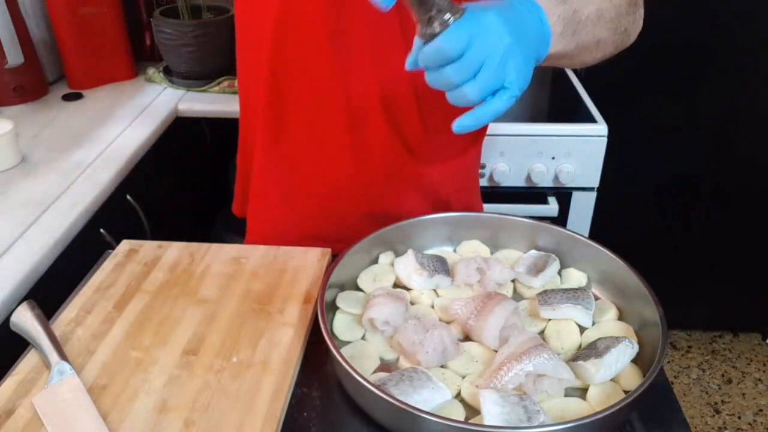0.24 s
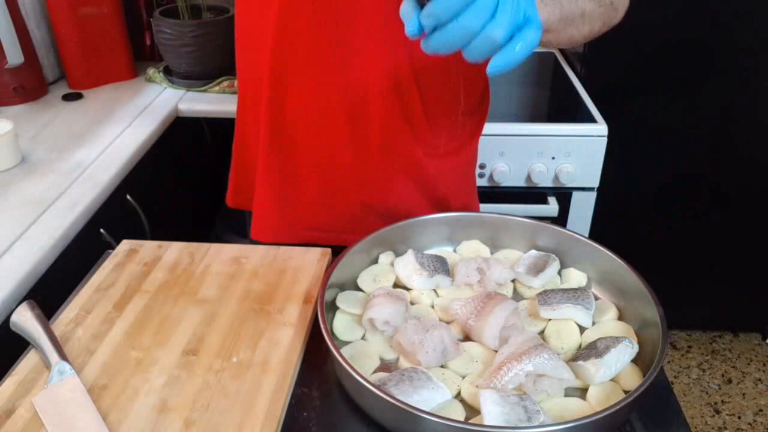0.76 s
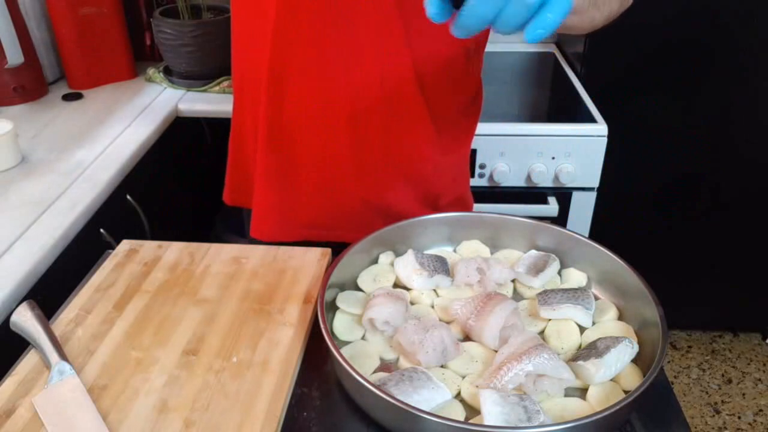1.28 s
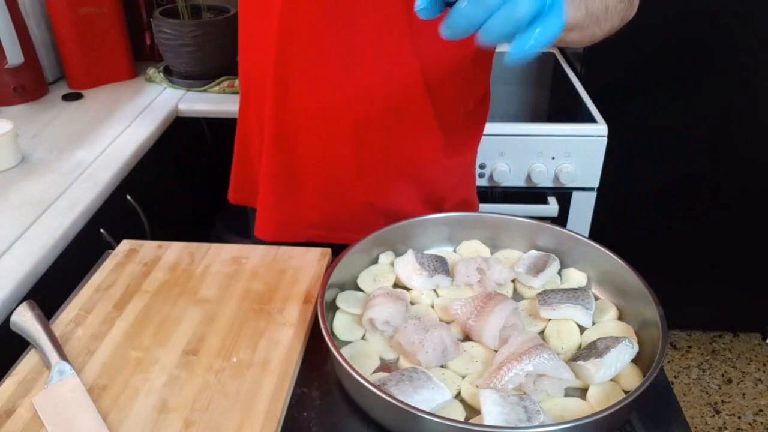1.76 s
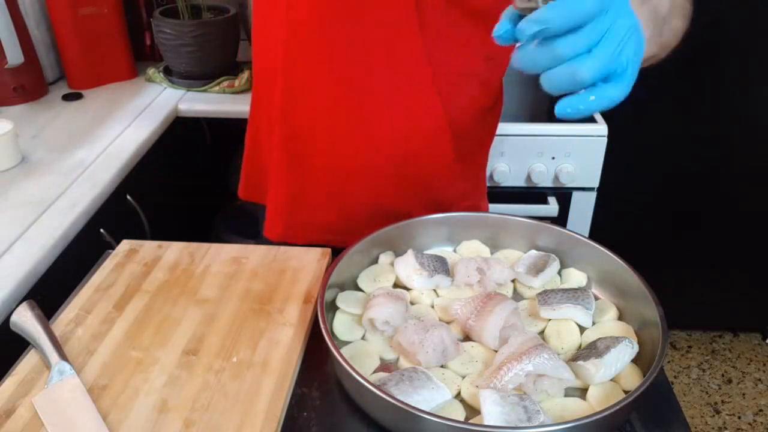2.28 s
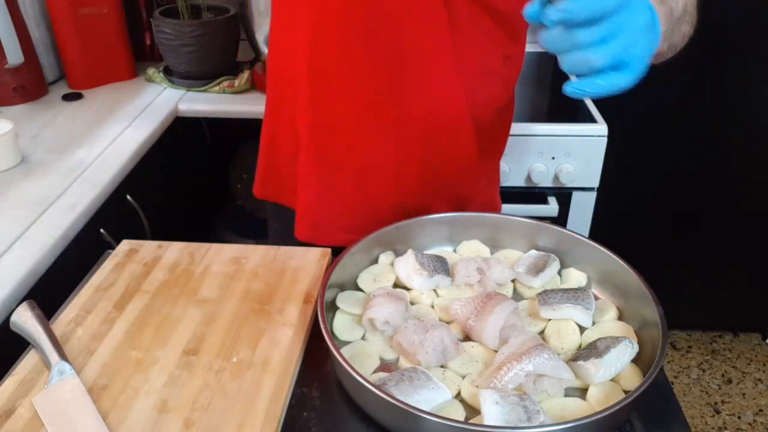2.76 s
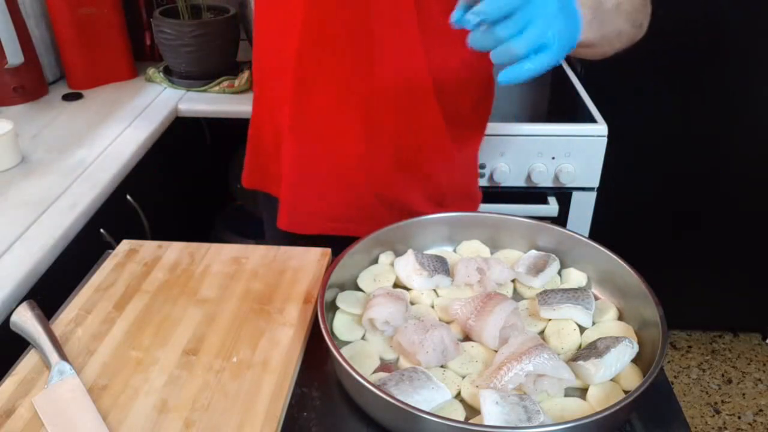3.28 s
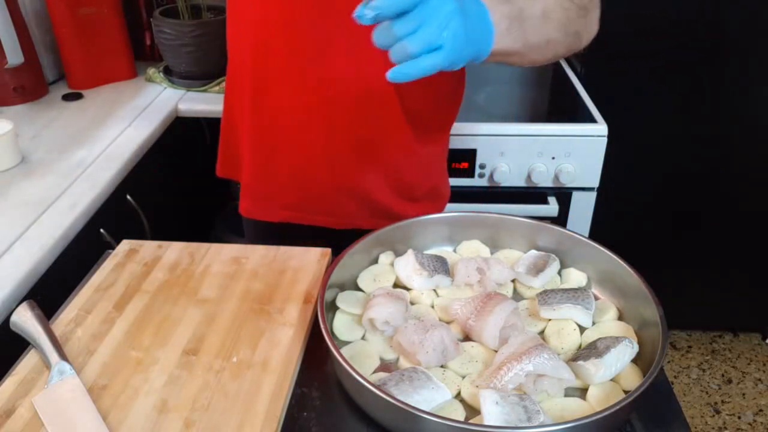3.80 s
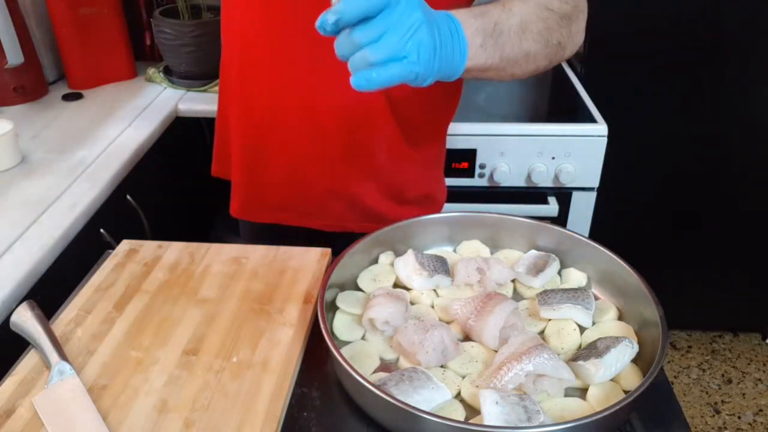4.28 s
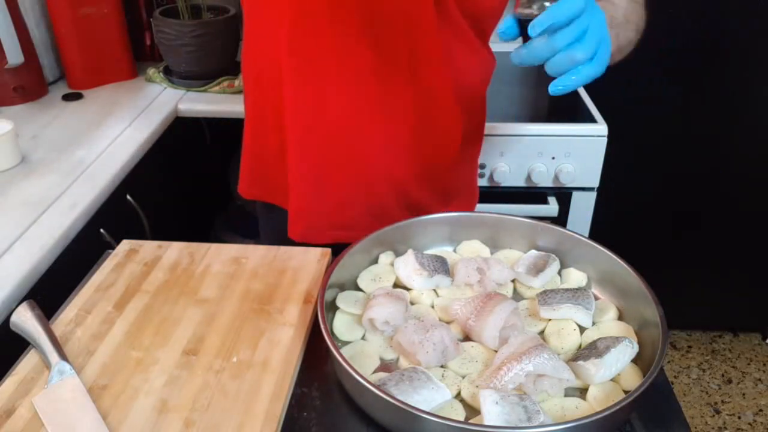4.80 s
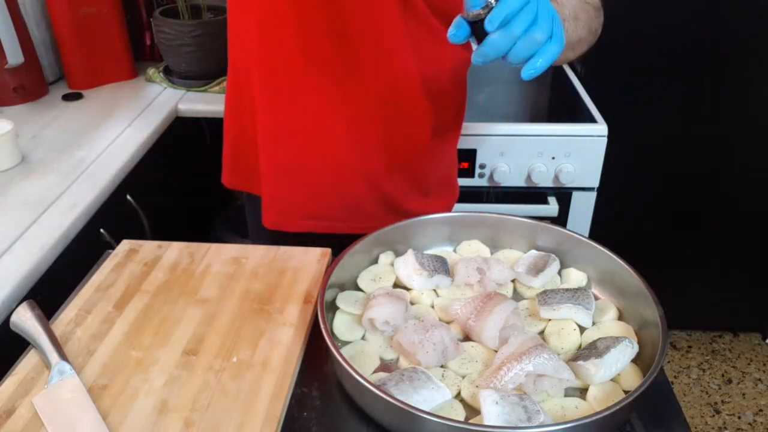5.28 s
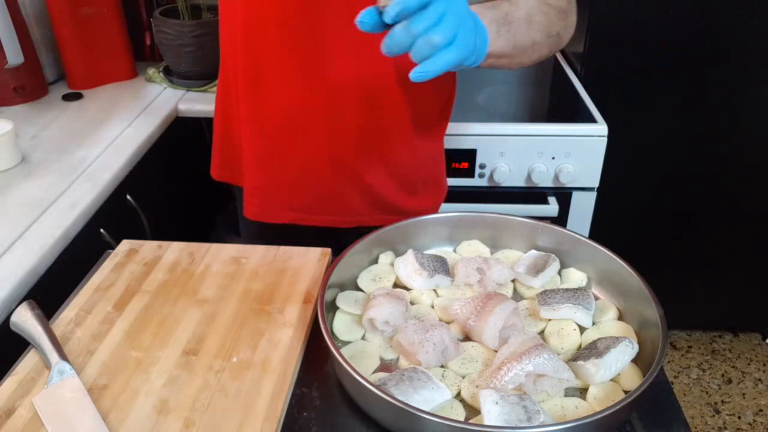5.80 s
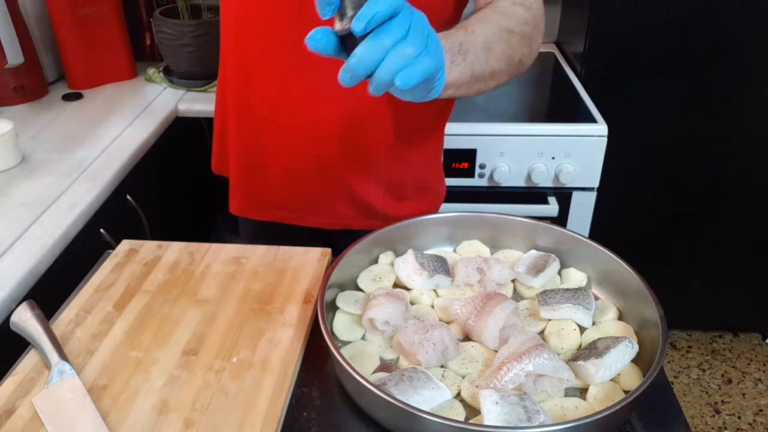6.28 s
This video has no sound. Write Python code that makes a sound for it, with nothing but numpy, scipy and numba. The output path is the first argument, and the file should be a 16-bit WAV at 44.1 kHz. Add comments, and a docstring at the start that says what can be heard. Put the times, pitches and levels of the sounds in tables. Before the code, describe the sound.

A pepper mill is turned by hand close to the microphone: brief dry crunches, each a cluster of brittle cracks with metallic burr rasp and a woody hollow undertone. Between strokes a gloved grip shifts with papery, squeaky-free rustles and occasional thin hiss. The loudest snap comes early, near one second; a longer pause falls before the final crunches. A steady low electrical hum lies underneath, with a short kitchen reverberation.

```python
"""Mains hum and rumble from an appliance run throughout, as wavering cosines and shaped noise.
From the start a rubber glove slides over a pepper mill: grains of friction drive rustling bands, at times with
a thin hiss. The kitchen returns a short noise tail. A dull scrape of filtered grit comes near 0.3 s and the first
crack at 0.37 s; from 0.7 s short strokes crush grit and crack corns, driving resonances of burrs and body.
At 4.75 s the hum jumps in phase, a small dry tick."""
import sys
import numpy as np
from scipy import signal
from scipy.fft import rfft, irfft
from scipy.io import wavfile
from scipy.ndimage import uniform_filter1d
from numba import njit

SR = 44100
rng = np.random.default_rng(int(sys.argv[2]) if len(sys.argv) > 2 else 0)


def generate_wav(signal):
    """Clip the signal to [-1, 1] and save it as 16-bit WAV at the path in sys.argv[1]."""
    frames = np.transpose(np.atleast_2d(signal))
    scaled = np.clip(frames, -1, 1) * 32767
    pcm = np.round(scaled).astype(np.int16)
    wavfile.write(sys.argv[1], SR, pcm)


N = 288678

# Hum lines: (multiple of HUM_HZ [1], level [dB rms], waver [dB])
HUM_LINES = [(49 / 100, -79, 1.7), (1, -48.5, 0.89), (2, -64, 1.5)]
HUM_HZ = 99.96
JUMP_S, JUMP_MS = 4.753, 4.3  # when the hum skips ahead, and by how much
JUMP_OFFSET_S = -0.00085  # places the jump within the cycle
# Appliance rumble and air: (frequency [Hz], spectral density [dB per Hz])
RUMBLE_SPECTRUM = [(22, -91), (48, -91), (66, -86.5), (125, -81.5), (160, -82), (235, -90.5), (300, -88),
                   (450, -91), (650, -102), (1000, -108), (1700, -117), (2600, -117), (4200, -113),
                   (6500, -114), (9500, -128)]
# Slides of the glove on the mill: (start [s], rise [s], fall [s], peak drive [dB], starting centre [Hz],
# final centre [Hz], breadth of colour [0-1])
GLOVE_SLIDES = [(0, 0.0042, .14, -62, 4030, 3500, 0.76), (.272, .03, 0.095, -64, 5850, 4400, 0.36),
                (0.37, 0.0055, 0.18, -55.5, 4600, 3830, 0.64), (.52, 0.093, .07, -60, 4460, 5430, 0.75),
                (.72, .06, 0.044, -66, 5000, 4930, 0.3), (.98, 0.084, 0.33, -58.5, 4700, 4000, 0.9),
                (1.25, .1, .03, -67.5, 5770, 4500, 1), (1.58, 0.051, .06, -58.5, 4260, 4380, .6),
                (1.72, 0.04, 0.031, -54.5, 6080, 6000, .85), (2.05, 0.061, .06, -59.5, 4600, 4770, 0.27),
                (2.12, 0.045, 0.026, -62, 5400, 5670, 0.7), (2.4, .06, 0.081, -63.5, 5250, 5130, 0.4),
                (2.52, 0.062, .05, -55, 6200, 6850, 0.6), (2.83, 0.074, 0.087, -59.5, 4760, 5250, 0.6),
                (3.04, 0.079, 0.085, -55.5, 4800, 4780, 0.33), (3.67, 0.055, 0.076, -56, 5000, 4500, 0.7),
                (3.8, 0.049, 0.038, -64.5, 3900, 4600, 0.56), (3.89, .06, 0.094, -56, 4200, 4130, 0.27),
                (4.11, .06, 0.058, -61, 4940, 4880, 0.3), (4.23, 0.057, 0.075, -56, 7000, 7000, 0.5),
                (4.5, 0.058, 0.11, -58, 4330, 3730, 0.3), (4.76, .02, 0.054, -67.5, 4400, 4160, 0.3),
                (4.8, 0.11, 0.044, -72, 4240, 4940, 0.2), (4.93, 0.13, 0.2, -62, 3740, 6200, 1),
                (5.499, .04, 0.053, -63.5, 5270, 5600, .25), (5.6, 0.077, 0.11, -65, 5100, 3520, 0.22)]
GLOVE_EDGE_DB = -11.5  # start and end of a slide, relative to its peak
# Rustling bands of the rubbed glove: (centre [Hz], width setting [Hz], relative level [dB])
GLOVE_BANDS = [(3120, 670, -1.2), (3835, 440, 1.3), (4530, 700, -2.7), (5540, 440, -2.8), (6310, 870, -1.3),
               (7420, 1170, 0)]
# Narrow airy rubs: (start [s], fall [s], peak level [dB rms])
WHISPERS = [(0, 0.09, -71.5), (2.1, 0.043, -67.5), (3.72, 0.088, -66), (4.55, 0.11, -69),
            (4.96, 0.078, -74)]
WHISPER_HZ, WHISPER_WIDTH_HZ = 3120, 400
WHISPER_RISE_S, WHISPER_EDGE_DB = 0.041, -8  # edge relative to the peak
# Reverberant bands of the room: (centre [Hz], time to decay by 60 dB [s], tail energy [dB])
ROOM_BANDS = [(830, 0.45, -16), (2160, 0.37, -14.5), (4800, 0.61, -9), (8550, 0.23, -14.5)]
# Corners of a short dull scrape: (time [s], level [dB])
SCRAPE_CORNERS = [(0.262, -65), (0.292, -54.5), (0.35, -55.5), (0.39, -62.5)]
# Corns that crack: (time [s], drive energy [dB], relative body drive [dB], burr centre [Hz])
CORN_CRACKS = [(0.374, -32.5, -25, 3940), (0.7905, -41, -4, 5400), (0.8098, -41, -15, 5700),
               (0.8813, -20.5, -20, 4260), (0.8931, -10, -4.5, 5560), (1.0725, -37, -12, 6000),
               (1.372, -31, -5.5, 5860), (1.4149, -17.5, -7, 4230), (1.4384, -23, -24, 6260),
               (1.4597, -36, 0, 6790), (1.485, -26.5, -1, 6030), (1.4947, -30.5, -16, 5990),
               (1.766, -49, -19, 6500), (1.8215, -24.5, -35, 6500), (1.8412, -25.5, -13, 4640),
               (1.8641, -31, -8, 4900), (2.2274, -42, -14, 5680), (2.2445, -25, -21, 5410),
               (2.283, -34, -14, 4400), (2.3, -34, 0.5, 3780), (2.5833, -48, -23, 6900),
               (2.641, -32.5, -30, 6200), (2.6776, -26, -12, 4590), (2.6813, -22, -13, 5840),
               (2.6976, -20.5, -7, 4530), (2.7193, -22, -8.5, 4610), (2.7286, -19.5, -13, 5280),
               (2.743, -36, -3, 5080), (2.753, -29, -11, 5840), (3.0852, -39.5, -11, 5670),
               (3.1131, -36, -11, 4100), (3.139, -28, -18, 4240), (3.169, -32.5, -2, 4340),
               (3.529, -39.5, 0, 4900), (3.5658, -34, -6, 4800), (3.5986, -32, -18, 4710),
               (3.9971, -36, -1, 4330), (4.0224, -36, -14, 5770), (4.0394, -34, 1.5, 5830),
               (4.2573, -46, -19, 7470), (4.292, -46, -23, 7480), (4.375, -29.5, -12, 4500),
               (4.4403, -39, -3, 6370), (4.4686, -29.5, -8, 4730), (4.4783, -28, -7.5, 4600),
               (5.1819, -37.5, -0.5, 6200), (5.27, -39, -15, 6060), (5.2974, -29.5, -7.5, 6400),
               (5.3392, -40.5, -7, 4600), (6.0024, -41, -25, 6200), (6.2178, -20.5, -42, 4570),
               (6.2405, -26.5, -9.5, 4470), (6.324, -17.5, -4.5, 6450), (6.338, -54, -32, 4590),
               (6.377, -42, -13, 4430), (6.426, -33, -14, 6250)]
DEBRIS_DB, DEBRIS_S = -21.5, 0.015  # start relative to the crack; decay time constant
# Twists of the wrist: (start [s], push [s], drive at the bite [dB], drive at the end of the push [dB],
# relative body drive at full push [dB], body centre [Hz], burr centre [Hz])
WRIST_TWISTS = [(0.735, 0.08, -71, -46.5, 0, 1580, 4600), (0.86, 0.075, -58, -44, -2.5, 1560, 4960),
                (1.372, 0.049, -48, -44, 0.5, 1185, 5140), (1.45, .042, -57, -47, 4, 1630, 5560),
                (1.821, 0.048, -52, -42.5, -1, 1280, 5400), (2.225, 0.066, -52, -46, 0, 1290, 5200),
                (2.642, 0.082, -43.5, -44.5, -3, 1333, 5100), (3.081, 0.073, -54, -42.5, 2, 1070, 4950),
                (3.32, 0.088, -59.5, -50, -12, 1600, 3930), (3.527, 0.072, -49.5, -44, 0, 1210, 4900),
                (3.935, 0.092, -64.5, -47.5, 3.5, 940, 4970),
                (4.376, 0.095, -49.5, -50.5, -1.5, 1010, 4450), (5.179, 0.055, -59, -62.5, 4, 1470, 6000),
                (5.24, 0.11, -65, -53, -7, 1430, 5740), (6.002, 0.031, -61.5, -55.5, -11.5, 1550, 5750),
                (6.212, .036, -50, -46.5, -7, 1890, 4670), (6.322, 0.081, -51, -55, -3, 1810, 5330)]
RELEASE_S, RELEASE_DB = 0.073, -10.5  # the wrist lets go after the push
BODY_BITE_DB, BODY_RELEASE_DB = -6.5, -9.5  # body drive relative to full push
# Resonances of the metal burrs and cap: (centre [Hz], width setting [Hz], relative level [dB])
BURR_MODES = [(2550, 1480, -6.5), (3290, 770, -3), (3867, 630, -5), (4530, 580, 0.5), (5370, 1270, -5),
              (6120, 530, 0.5), (6740, 840, -5.5), (8180, 1800, -9.5), (9440, 730, -15.5)]
# Resonances of the hollow body: (centre [Hz], width setting [Hz], relative level [dB])
BODY_MODES = [(898, 580, -10), (1006, 271, 3.5), (1269, 204, -2), (1448, 460, -2), (2073, 1750, -3)]
CEILING, TOP_HZ = 0.17, 10050  # saturation amplitude; upper edge of the passband


def undb(db):
    """Logarithmic level: decibels to amplitude ratio."""
    return 10 ** (np.asarray(db) / 20)


def unit(x):
    """Normalisation of power: scale to rms 1."""
    return x / np.sqrt(np.mean(x ** 2))


@njit
def svf(x, hz, width):
    """Second-order resonance: a state-variable band-pass, gain 1 at the centre."""
    y, b, l = np.empty(len(x)), 0., 0.
    g, k = np.tan(np.pi * hz / SR), width / hz
    for i in range(len(x)):
        v = (b + g * (x[i] - l)) / (1 + g * (g + k))
        b, l, y[i] = 2 * v - b, l + 2 * g * v, k * v
    return y


def band(x, hz, width):
    """The same resonance with a minute bias, which keeps it quick to compute in silence."""
    return svf(x + 1e-18, float(hz), float(width))


def walk(rate):
    """Slow random modulation: levels held 1 / rate s, smoothed twice, scaled to rms 1."""
    hold = int(SR / rate)
    steps = np.repeat(rng.standard_normal(N // hold + 1), hold)
    smooth = uniform_filter1d(uniform_filter1d(steps, hold), hold)
    return unit(smooth[:N])


def play(events, fade_s):
    """Piecewise envelopes in dB, summed as gains; columns past (time, level) are interpolated."""
    t, gain = np.arange(N) / SR, np.zeros(N)
    for corners in map(np.array, events):
        start_s, end_s = corners[0, 0], corners[-1, 0]
        at = slice(max(int((start_s - fade_s) * SR), 0), int((end_s + fade_s) * SR))
        gate = np.clip(np.minimum(t[at] - start_s, end_s - t[at]) / fade_s + 1, 0, 1)
        gain[at] += gate * undb(np.interp(t[at], corners[:, 0], corners[:, 1]))
    rows = np.array(sorted(row for corners in events for row in corners))
    return gain, *(np.interp(t, rows[:, 0], column) for column in rows.T[2:])


def ring(x, modes, centre_hz, reach, patchy_db):
    """Modal superposition: modes near the moving centre are driven hardest, each with a random waver."""
    out, power = 0, 0
    for k, (hz, width, db) in enumerate(modes):
        share = undb(db) * np.exp(-(np.log(hz / centre_hz) / reach) ** 2)
        driven = x * share * undb(patchy_db * walk(30))
        # two filters in cascade steepen the skirts; neighbours have opposite polarity
        mode = band(band(driven, hz, width), hz, 2 * width)
        out = out + (-1) ** k * mode
        power = power + share ** 2 * width * 2 / SR
    return out / np.sqrt(uniform_filter1d(power * np.ones(N), size=400))


def grit(per_s, spread_db):
    """Shot noise: tiny impulses at random moments, their sizes scattered by spread_db."""
    sizes = undb(spread_db * rng.exponential(size=N)) * rng.standard_normal(N)
    return unit(sizes * (rng.random(N) < per_s / SR))


def appliance():
    """Periodic and random excitation: wavering mains lines over steady spectrally shaped noise."""
    t = np.arange(N) / SR - JUMP_S
    # half the jump on either side of the moment
    t = t + np.sign(t) * JUMP_MS / 2000
    t = t + JUMP_OFFSET_S
    hum = 0
    for multiple, db, waver_db in HUM_LINES:
        level = np.sqrt(2) * undb(db + waver_db * walk(8.6))
        hum = hum + level * np.cos(2 * np.pi * multiple * HUM_HZ * t)
    f = np.maximum(np.fft.rfftfreq(N, 1 / SR), 1)
    hz, db = np.transpose(RUMBLE_SPECTRUM)
    density = undb(np.interp(np.log(f), np.log(hz), db)) * np.sqrt(SR / 2)
    shape = density * np.minimum(f / hz[0], 1) ** 2  # 12 dB per octave off below the table
    return hum + irfft(rfft(rng.standard_normal(N)) * shape, N)


def slide(s, rise_s, fall_s, db, from_hz, to_hz, breadth):
    """Envelope of sliding friction: it swells and fades while its spectral centre glides."""
    peak_hz = from_hz + (to_hz - from_hz) * rise_s / (rise_s + fall_s)
    return [(s, db + GLOVE_EDGE_DB, from_hz, breadth),
            (s + rise_s, db, peak_hz, breadth),
            (s + rise_s + fall_s, db + GLOVE_EDGE_DB, to_hz, breadth)]


def glove():
    """Sliding friction: rubber on the mill excites rustling bands picked by the grip."""
    gain, hz, breadth = play([slide(*row) for row in GLOVE_SLIDES], fade_s=0.05)
    rub = grit(per_s=12000, spread_db=-2.0)
    flutter = undb(-5.0 + 2.0 * walk(25.18))
    return gain * flutter * ring(rub, GLOVE_BANDS, hz, np.clip(breadth, .12, 1), patchy_db=3.5)


def whisper():
    """Narrow-band noise: a thin hiss, quick to swell and slower to fade, between some strokes."""
    events = []
    for s, fall_s, db in WHISPERS:
        peak_s = s + WHISPER_RISE_S
        edge_db = db + WHISPER_EDGE_DB
        events.append([(s, edge_db), (peak_s, db), (peak_s + fall_s, edge_db)])
    gain, = play(events, fade_s=.02)
    hiss = band(rng.standard_normal(N), WHISPER_HZ, WHISPER_WIDTH_HZ)
    hiss = band(hiss, WHISPER_HZ, WHISPER_WIDTH_HZ)
    return gain * unit(hiss)


def kitchen(x):
    """Reverberation: dense reflections off hard walls, each band decaying exponentially at its own rate."""
    t = np.arange(SR) / SR
    tail = 0
    for hz, t60_s, db in ROOM_BANDS:
        noise = unit(band(rng.standard_normal(SR), hz, 1.9 * hz))
        decay = undb(db - 60 * t / t60_s)
        tail = tail + decay * noise / np.sqrt(t60_s * SR / np.log(1e6))
    tail = tail * np.clip((t - .002) / 0.0079, 0, 1)  # builds up after a 2 ms gap
    return signal.fftconvolve(x, tail)[:N]


def scrape():
    """Coarse friction: a brief drag of sparse impulses, band-limited to a dull sound."""
    gain, = play([SCRAPE_CORNERS], fade_s=.004)
    drag = band(grit(per_s=2000, spread_db=2.2), 530, 1500)
    edges = signal.butter(5, (380., 2300.), btype="band", fs=SR, output="sos")
    return gain * unit(signal.sosfilt(edges, drag))


def debris():
    """Exponential relaxation: extra crushing follows every crack and dies away."""
    kicks = np.zeros(N)
    for s, db, *_ in CORN_CRACKS:
        kicks[int(s * SR)] += undb(db + DEBRIS_DB)
    return signal.lfilter([1], [1, -np.exp(-1 / (DEBRIS_S * SR))], kicks)


def twist(s, push_s, bite_db, full_db, body_db, *hz):
    """Envelope of forced crushing: the corners of one stroke are bite, full push and release."""
    full_s = s + push_s
    return [(s, bite_db, body_db + BODY_BITE_DB, *hz),
            (full_s, full_db, body_db, *hz),
            (full_s + RELEASE_S, full_db + RELEASE_DB, body_db + BODY_RELEASE_DB, *hz)]


def mill():
    """Forced modal vibration: crushed grit and cracking corns drive the resonances of burrs and body."""
    gain, body_db, body_hz, burr_hz = play([twist(*row) for row in WRIST_TWISTS], fade_s=0.0047)
    gain = np.hypot(gain, debris())
    # the burrs catch and slip, so the crushing comes in quick lumps
    lumps = walk(90)
    burr = gain * undb(-3.5 + 2.0 * lumps) * grit(per_s=4000, spread_db=0.5)
    body = gain * undb(body_db - 0.5 + 2.24 * lumps) * grit(per_s=2500, spread_db=1.33)
    shells = np.zeros(N)
    tear = np.arange(400) / SR
    for (s, db, rel_db, hz), chips in zip(CORN_CRACKS, rng.standard_normal((len(CORN_CRACKS), len(tear)))):
        # a shell tears in a couple of milliseconds
        snap = chips * (1 - np.exp(-tear / 0.000098)) * np.exp(-tear / 0.0024)
        snap = undb(db) * snap / np.sqrt(np.sum(snap ** 2))
        at = slice(int(s * SR), int(s * SR) + len(tear))
        burr[at] += undb(5.0) * snap
        # the body feels the blow as one short push
        body[at] += undb(db + rel_db - 2.0) * np.exp(-tear / 0.00017)
        shells[at] += undb(0.99 * rel_db) * snap
        burr_hz[at] = hz
    burr_ring = ring(burr, BURR_MODES, burr_hz, reach=0.74, patchy_db=3.0)
    body_ring = ring(body, BODY_MODES, body_hz, reach=0.45, patchy_db=1.05)
    # the snap itself is also heard, in one broad band
    return burr_ring + body_ring + undb(11.0) * band(shells, 2000, 2100)


def scene():
    """Linear superposition: near sources, their reverberation and the appliance add."""
    near = mill() + glove() + whisper() + scrape()
    return (near + kitchen(near) + appliance())[None]


def record(dry):
    """Saturation and band limiting: the recorder rounds the loudest cracks and cuts the top steeply."""
    rounded = CEILING * np.tanh(dry / CEILING)
    # order 10, 0.5 dB passband ripple, 80 dB stopband
    lowpass = signal.ellip(10, .5, 80, TOP_HZ, fs=SR, output="sos")
    return signal.sosfilt(lowpass, rounded)


dry = scene()
out = record(dry)
generate_wav(out)
```